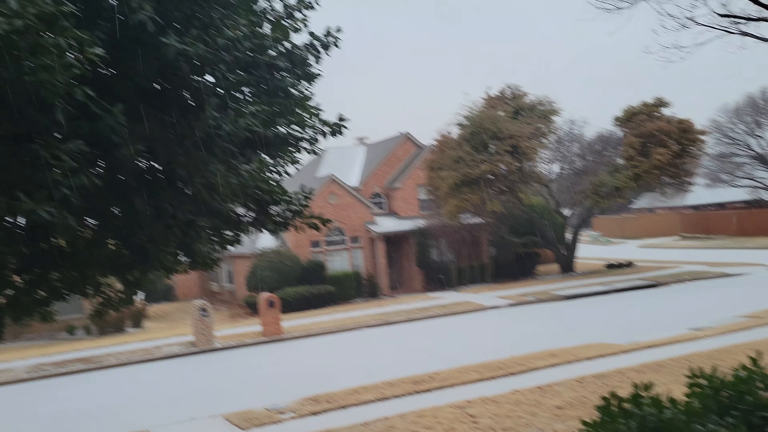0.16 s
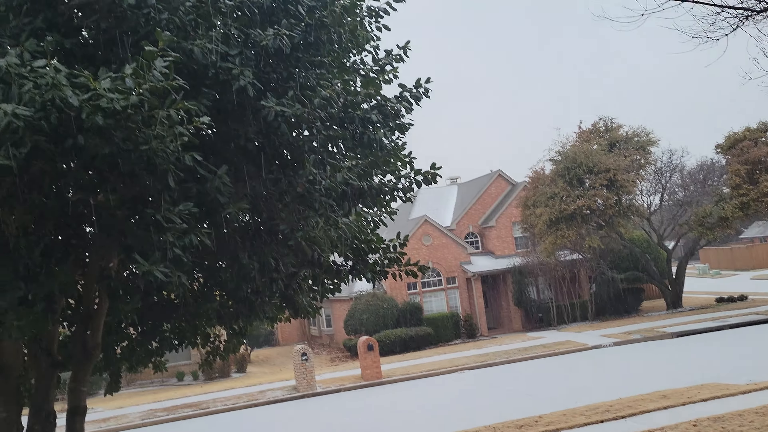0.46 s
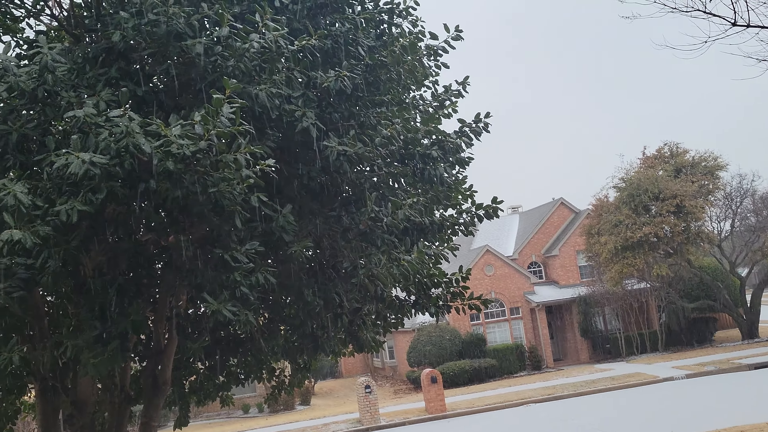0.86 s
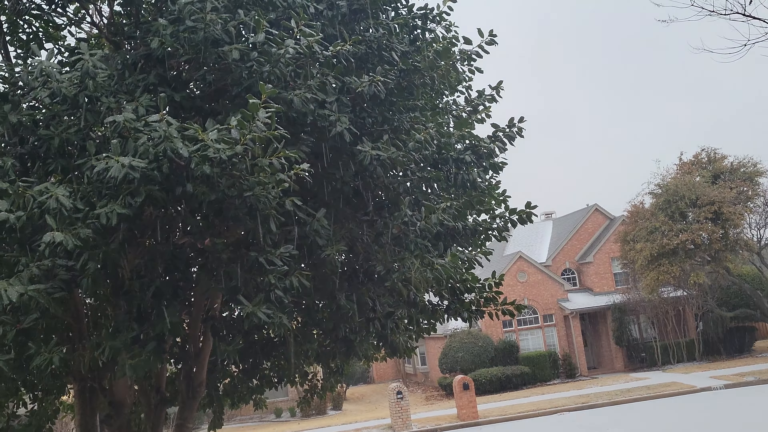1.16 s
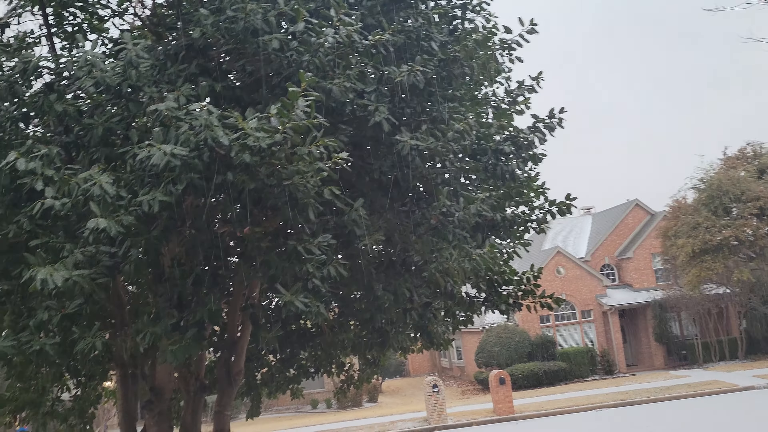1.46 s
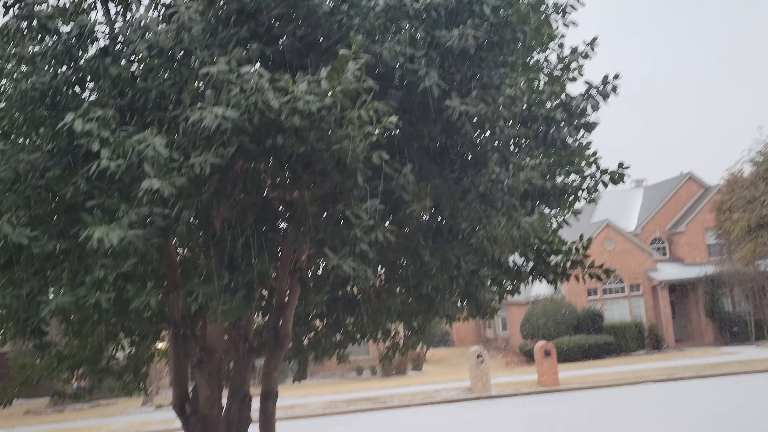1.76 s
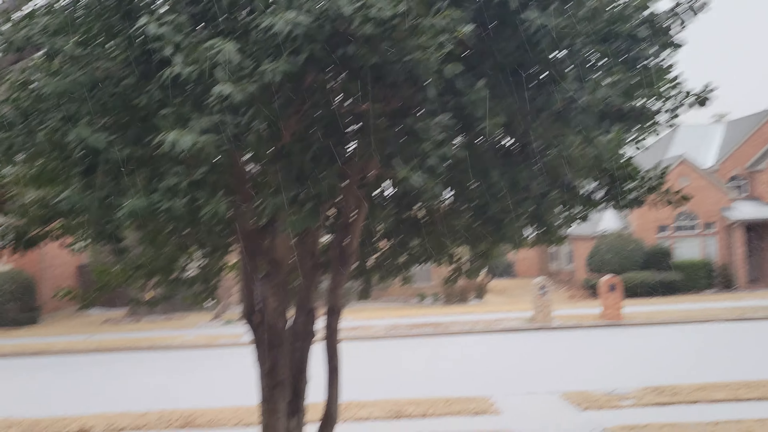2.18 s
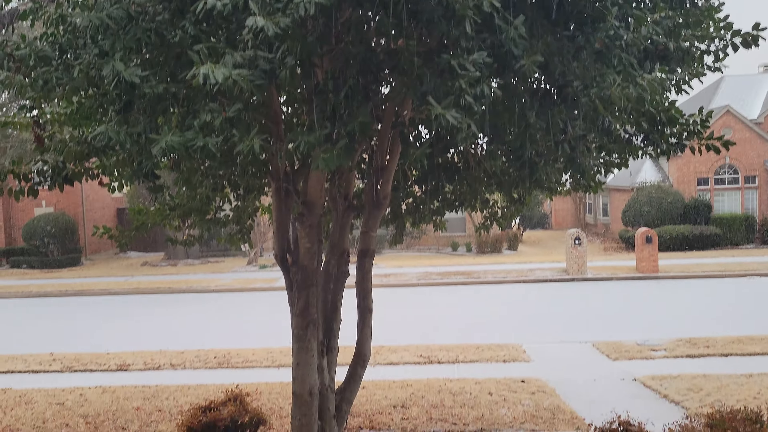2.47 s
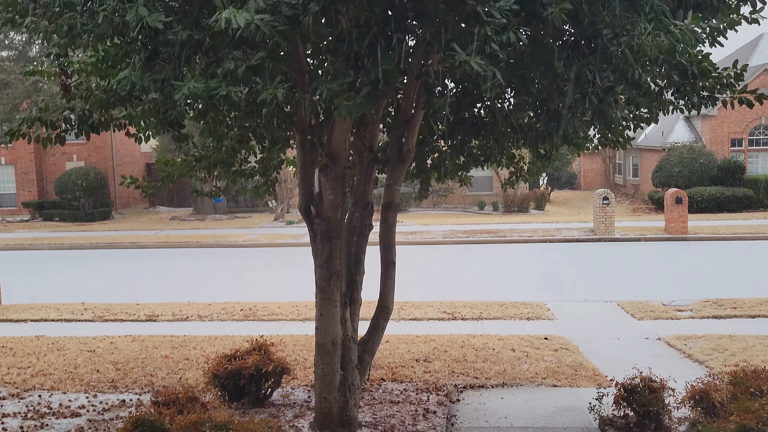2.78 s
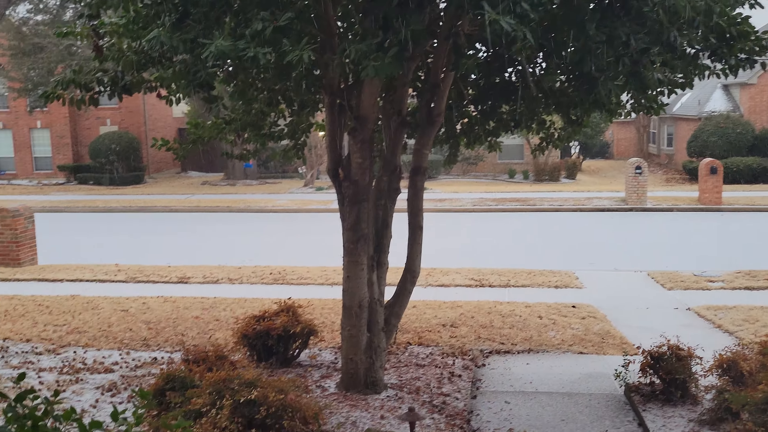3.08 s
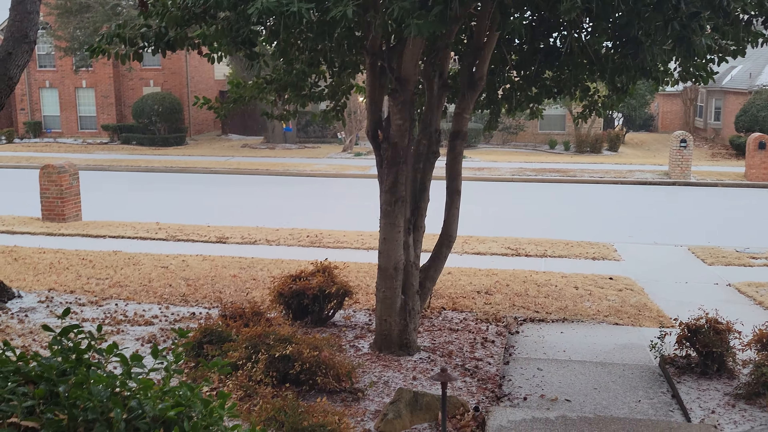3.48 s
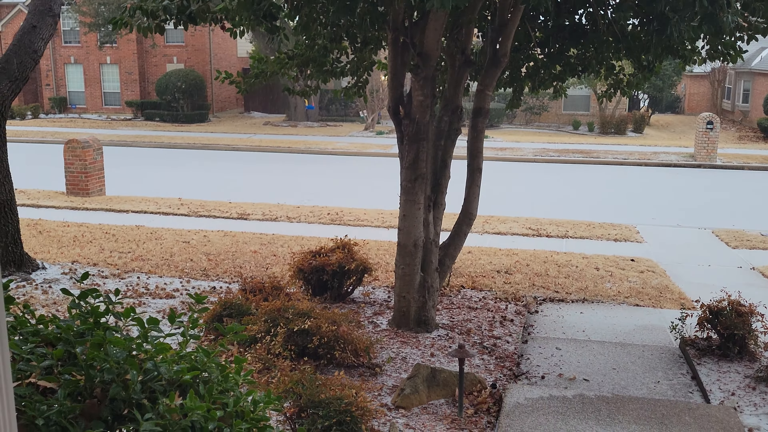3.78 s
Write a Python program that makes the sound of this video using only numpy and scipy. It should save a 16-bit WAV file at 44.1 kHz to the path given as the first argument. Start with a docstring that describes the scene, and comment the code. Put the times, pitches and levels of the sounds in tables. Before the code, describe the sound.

Dense sleet hisses brightly and widely from 0 to about 4 seconds, already falling at the start and never stopping. Thousands of tiny crisp pellets tick and bounce on leaves, paving and ice crust, blending into the hiss. The fall wavers slightly, and the treble gradually fills out as the microphone turns. A faint, centred low rumble of distant traffic gently swells underneath. Open residential yard, no distinct single events.

```python
"""A bright, wide hiss comes first: heavy sleet on a suburban yard, its far pellets made of patchy noise.
Nearer pellets tick on leaves, paving and ice crust: short fading tones that sound again after one hop.
The fall thickens and thins a little, and a hollow in the treble slowly fills in.
Distant traffic rumbles faintly underneath: low filtered noise, almost the same in both ears."""
import sys
import numpy as np
from scipy import signal
from scipy.fft import rfft, irfft, next_fast_len
from scipy.io import wavfile
from scipy.ndimage import uniform_filter1d, map_coordinates

SR = 44100
rng = np.random.default_rng(int(sys.argv[2]) if len(sys.argv) > 2 else 0)


def store_pcm(level_fs):
    """Save levels as 16-bit WAV."""
    pcm = np.round(np.clip(level_fs, -1, 1) * 32767).astype(np.int16)
    wavfile.write(sys.argv[1], SR, np.atleast_2d(pcm).T)


N = 173313  # length in samples


def amp(db):
    """Turn decibels into a gain."""
    return 10 ** (np.asarray(db) / 20)


def unit(x):
    """Scale a sound to an average strength (rms) of 1."""
    return x / np.sqrt(np.mean(x ** 2) + 1e-20)


def along(points, hz):
    """Read each column of a frequency table at the given hz, spacing frequencies by ratio."""
    table_hz, *columns = np.transpose(points)
    return np.array([np.interp(np.log(hz + 1), np.log(table_hz + 1), column) for column in columns])


def curves(rows):
    """Join the rows of a time table with straight lines, one curve per column after the time."""
    seconds, *columns = np.transpose(rows)
    return [np.interp(np.arange(N) / SR, seconds, column) for column in columns]


def wobble(rate):
    """A smooth random curve through `rate` random points a second."""
    points = rng.standard_normal(size=1024)
    return map_coordinates(points, [np.arange(N) * rate / SR], mode="wrap")


def filtered(x, response):
    """Change the strength of each frequency in x by response(hz)."""
    padded = next_fast_len(N + SR // 2)  # silence after the end keeps it from wrapping to the start
    spectrum = rfft(x, padded) * response(np.fft.rfftfreq(padded, 1 / SR))
    return irfft(spectrum, padded)[..., :N]


# unevenness of the far hiss in dB, and the width of its patches in Hz and seconds
PATCH_DB, PATCH_HZ, PATCH_S = 1.38, 350, .08


def far_hiss():
    """Countless far pellets blur into stereo noise, with shallow random patches in time and pitch."""
    noise = rng.standard_normal((2, N))
    hz, seconds, spectrum = signal.stft(noise, SR, nperseg=512)
    patches = rng.standard_normal(spectrum.shape)
    patches = uniform_filter1d(patches, max(1, int(PATCH_HZ / hz[1])), axis=1)
    patches = uniform_filter1d(patches, max(1, int(PATCH_S / seconds[1])), axis=2)
    patchy = signal.istft(spectrum * amp(PATCH_DB * unit(patches)), nperseg=512)[1]
    return unit(patchy[:, :N])


PITCH_SPREAD = 0.24  # spread of the natural log of pitch
SIZE_SPREAD_DB, LARGEST_DB = 2, 12.5  # average and greatest extra level of a pellet
BOUNCE_S, BOUNCE_LOSS_DB = .035, 6.5  # average hop time, and how much weaker the second tick is
EAR_SPREAD_S = .001  # full range of arrival differences between the microphones


def pellets(rate, ring_hz, cycles):
    """Each pellet rings briefly where it lands, then again, weaker, after a hop; stereo, rms 1."""
    count = int(rate * N / SR)
    when, size, place, hop, lag = rng.random((count, 5)).T
    pitch = ring_hz * np.exp(PITCH_SPREAD * rng.standard_normal((count, 1)))
    pitch = np.minimum(pitch, SR / 2)
    age = np.arange(192)  # samples since impact
    turns = pitch * age / SR
    # many small pellets, few large ones
    strength = amp(np.minimum(-SIZE_SPREAD_DB * np.log(1 - size), LARGEST_DB))
    fade = np.exp(-np.log(1000) * turns / cycles)  # down 60 dB after `cycles` turns
    ticks = strength[:, None] * np.sin(2 * np.pi * turns) * fade
    landing = when * N / SR
    second = landing + BOUNCE_S * (.5 + hop)
    gains = np.cos(place * np.pi / 2), np.sin(place * np.pi / 2)
    delays = 0, (lag - .5) * EAR_SPREAD_S
    ears = np.zeros((2, N))
    for ear, gain, delay in zip(ears, gains, delays):
        for start, loss_db in ((landing, 0), (second, BOUNCE_LOSS_DB)):
            # ticks that pass the end wrap round to the start
            at = (((start + delay) * SR).astype(int)[:, None] + age) % N
            ear += amp(-loss_db) * np.bincount(at.ravel(), (gain[:, None] * ticks).ravel(), N)
    return unit(ears)


# What the near pellets strike, by name.
# Each row: pellets per second, middle ring pitch in Hz, cycles to fade by 60 dB, relative level in dB.
IMPACT_SURFACES = {"leaves": (1200, 3603, 8.5, -5), "paving": (1996, 7005, 11, -2.5),
                   "ice crust": (2000, 13630, 21, 1.3)}


def near_ticks():
    """Each surface rings at its own pitch; their ticks add up to a stereo sound of rms 1."""
    layers = (amp(db) * pellets(rate, hz, cycles) for rate, hz, cycles, db in IMPACT_SURFACES.values())
    return unit(sum(layers))


# Colour of the sleet at the two microphones, before the slow and quick level changes.
# Each row: frequency in Hz, left level in dB per Hz, right level in dB per Hz (for even noise of rms 1).
SLEET_COLOUR = [(100, -104, -104), (296, -89.5, -89.5), (456, -86.5, -84), (665, -82, -81),
                (750, -76.5, -77.3), (940, -79, -77), (1230, -74, -73.5), (1520, -77, -73.5),
                (2360, -74, -71), (3020, -70, -67.5), (5080, -70.5, -66.5), (6100, -68, -64),
                (7640, -66.5, -64), (8930, -73.5, -70.5), (9700, -73, -75), (11130, -72, -72.5),
                (12300, -67.2, -66), (15500, -65, -66.5)]
# How alike the two microphones sound; a negative value means they tend to move in opposite directions.
# Each row: frequency in Hz, correlation from -1 to 1.
EAR_LIKENESS = [(150, 0.78), (270, 0.49), (420, 0.11), (600, -.08), (850, -0.45), (1400, -0.57),
                (2200, -0.11), (5000, -0.0066), (10000, 0)]


def microphones(x):
    """Blend the two sides by frequency to set how alike they are, then colour each in its own way."""
    def turn(hz):
        """Blending angle in radians that gives independent sides the wanted correlation."""
        return np.arcsin(np.clip(along(EAR_LIKENESS, hz), -1, 1)) / 2

    own = filtered(x, lambda hz: np.cos(turn(hz)))
    other = filtered(x[::-1], lambda hz: np.sin(turn(hz)))
    # the square root turns a level per Hz into a gain for noise of rms 1
    return filtered(own + other, lambda hz: amp(along(SLEET_COLOUR, hz)) * np.sqrt(SR / 2))


HOLLOW_HZ, HOLLOW_WIDTH_HZ, HOLLOW_FILL_DB_PER_S = 9700, 2300, .7


def turning(x):
    """As the microphones turn, the hollow in the treble fills in: that band rises steadily in level."""
    hollow = filtered(x, lambda hz: np.exp(-((hz - HOLLOW_HZ) / HOLLOW_WIDTH_HZ) ** 2))
    seconds_from_middle = (np.arange(N) - N / 2) / SR
    return x + hollow * (amp(HOLLOW_FILL_DB_PER_S * seconds_from_middle) - 1)


FAR_DB, NEAR_DB = -0.62, -7.5  # mix of hiss and ticks before colouring
TREBLE_HZ = 9000  # where body gives way to treble
# quick changes in how thickly it falls: random points a second, and typical sizes in dB
FLURRY_PER_S, FLURRY_DB, TREBLE_FLURRY_DB = 24, .22, 0.37
# Slow drift of the hiss.
# Each row: time in seconds, level change of the body in dB, level change of the treble in dB.
SLOW_DRIFT = [(0, 0.9, -1), (.15, 0.2, 1), (.4, 0.3, -1.3), (.5, 0, .4), (1.08, 0.5, 0), (1.5, 0.15, -0.4),
              (2.0, -0.4, -.5), (2.2, 0.4, 0.3), (2.42, -0.46, -1), (2.95, -0.1, 0), (3.35, -.3, -0.3),
              (3.93, 0.15, 0)]


def sleet():
    """Far pellets blur into hiss, near ones tick; both follow the thickness of the fall."""
    far = far_hiss()
    near = near_ticks()
    fall = turning(microphones(amp(FAR_DB) * far + amp(NEAR_DB) * near))
    body = filtered(fall, lambda hz: 1 / (1 + (hz / TREBLE_HZ) ** 8))
    treble = fall - body
    body_db, treble_db = curves(SLOW_DRIFT)
    treble_db = treble_db + TREBLE_FLURRY_DB * wobble(FLURRY_PER_S)
    thickness = amp(FLURRY_DB * wobble(FLURRY_PER_S))
    return thickness * (amp(body_db) * body + amp(treble_db) * treble)


TRAFFIC_DB = -53.5  # level before the swell
TRAFFIC_PAN_DB, TRAFFIC_SIDE_DB = -0.5, -14.5  # left change (right is opposite); stereo difference
# Colour of the distant traffic.
# Each row: frequency in Hz, relative level in dB per Hz.
TRAFFIC_COLOUR = [(10, -29), (20, -12), (37, -0.5), (46, -9.5), (58, 3), (68, -2.5), (82, -0.5), (108, -8),
                  (124, -7), (155, -19), (215, -18.5), (400, -30), (1000, -38)]
# Swell of the rumble.
# Each row: time in seconds, level change in dB.
RUMBLE_SWELL = [(0, -.3), (.7, 2.3), (1.1, -1), (1.7, 2.2), (2.07, -0.5), (2.3, 2.5), (2.7, -1.5),
                (3.3, 0.5), (3.55, 1.2), (3.93, 0)]


def traffic():
    """Distant roads: low noise, mostly shared by both ears, rising and sinking in level."""
    noise = rng.standard_normal((2, N))
    mid, side = unit(filtered(noise, lambda hz: amp(along(TRAFFIC_COLOUR, hz))))
    side = amp(TRAFFIC_SIDE_DB) * side
    pair = np.array([mid + side, mid - side])
    pair = pair * amp([[TRAFFIC_PAN_DB], [-TRAFFIC_PAN_DB]])
    return amp(TRAFFIC_DB + curves(RUMBLE_SWELL)[0]) * pair


def scene():
    """Sleet all around, over the rumble."""
    return sleet() + traffic()


TOP_HZ = 15760


def record(dry):
    """The recorder keeps nothing above its band limit."""
    return filtered(dry, lambda hz: hz < TOP_HZ)


dry = scene()
out = record(dry)
store_pcm(out)
```